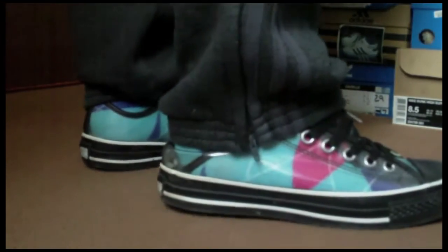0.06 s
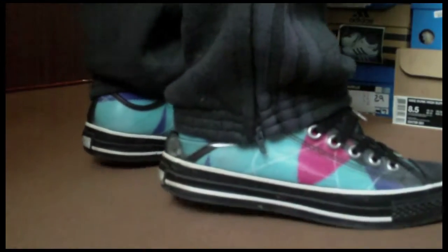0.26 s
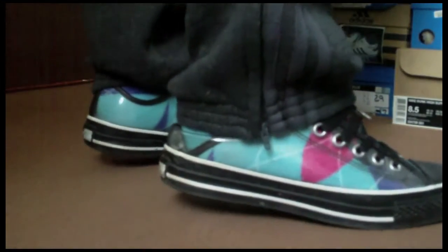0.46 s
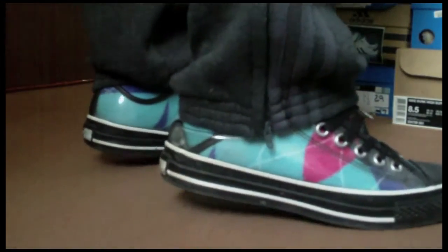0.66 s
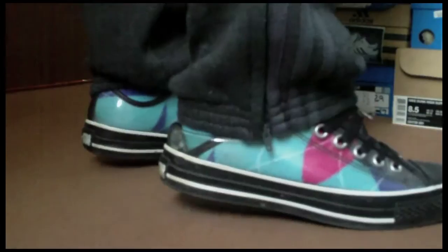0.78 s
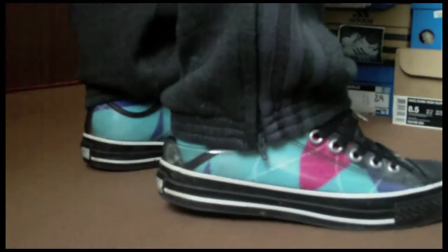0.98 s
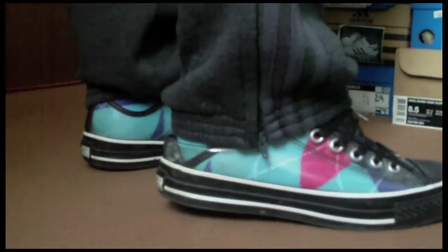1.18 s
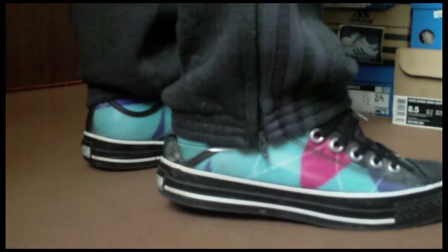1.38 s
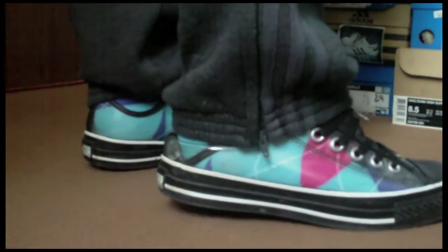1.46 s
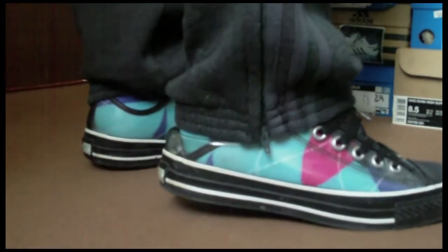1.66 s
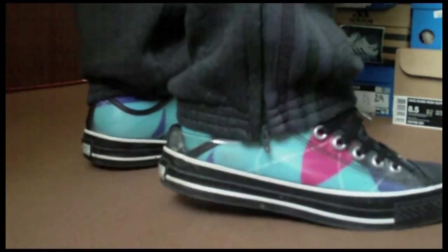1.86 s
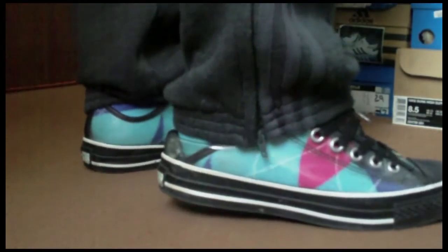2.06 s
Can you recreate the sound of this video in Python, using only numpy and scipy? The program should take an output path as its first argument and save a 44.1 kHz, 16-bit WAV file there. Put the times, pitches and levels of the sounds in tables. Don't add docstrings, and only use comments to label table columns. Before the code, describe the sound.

Shoe soles shift with sticky creaks, a hard heel knock and tiny squeaks over faint hiss.

```python
import sys
import numpy as np
from scipy import signal
from scipy.fft import rfft, irfft
from scipy.io import wavfile
from scipy.ndimage import uniform_filter1d

SR = 44100
rng = np.random.default_rng(int(sys.argv[2]) if len(sys.argv) > 2 else 0)


def natural_amplitude(level_db):
    exponent = np.asarray(level_db, float) / 20
    return 10 ** exponent


def dump_mix(stems):
    frames = np.atleast_2d(stems).T
    limited = np.clip(frames, -1, 1)
    pcm = np.round(limited * 32767).astype(np.int16)
    wavfile.write(sys.argv[1], SR, pcm)


N = 92610


def band(x, hz, width_hz):
    return signal.lfilter(*signal.iirpeak(hz, hz / width_hz, fs=SR), x)


def steep(x, low_hz, high_hz):
    return signal.sosfilt(signal.butter(4, [low_hz, high_hz], "band", fs=SR, output="sos"), x)


def ring(x, hz, t60):
    pole = np.exp(2j * np.pi * hz / SR - np.log(1000) / (t60 * SR))
    return signal.lfilter([1], [1, -pole], x).imag


def add(out, s, x):
    i = max(int(s * SR), 0)
    out[i:i + len(x)] += x[:N - i]


def walk(rate, size):
    hold = int(SR / rate)
    steps = np.repeat(rng.standard_normal(size // hold + 1), hold)
    return 1.3 * uniform_filter1d(steps, hold)[:size]


def hiss():
    # (frequency [Hz], level [dB per Hz])
    colour = [(70, -36), (228, -13.5), (524, -6.5), (1100, -3.5), (2500, -15), (6000, -24.5), (11000, -28),
              (15000, -39.5)]
    # (time [s], level [dB])
    stir = [
        (0, 0.5),
        (.7, -0.5),
        (1.3, 0),
        (1.6, -2),
    ]
    level_db, swell_db, flicker_db = -58, 0.3, 1.0
    hz = np.maximum(np.fft.rfftfreq(N, 1 / SR), 1)
    colour_hz, colour_db = np.transpose(colour)
    spectrum = rfft(rng.standard_normal(N)) * natural_amplitude(np.interp(np.log(hz), np.log(colour_hz), colour_db))
    place = 2 * np.log2(hz / 30)
    swell = walk(1.96, N)
    out = 0
    for k in range(20):
        one_band = irfft(spectrum * np.clip(1 - abs(place - k), 0, 1), N)
        out = out + one_band * natural_amplitude(swell_db * swell + flicker_db * walk(12.28, N))
    stir_db = np.interp(np.arange(N) / SR, *np.array(stir).T)
    return out * natural_amplitude(level_db + stir_db) / np.std(out)


def room(x):
    level_db, gap_s, t60_s, top_hz = -11, 0.007, 0.12, 4100
    t = np.arange(SR // 2) / SR
    tail = rng.standard_normal(len(t)) * natural_amplitude(-60 * t / t60_s) * (t > gap_s)
    tail = signal.lfilter(*signal.butter(1, top_hz, fs=SR), tail)
    return natural_amplitude(level_db) * signal.fftconvolve(x, tail / np.sqrt(np.sum(tail ** 2)))[:N]


def thuds():
    # (time [s], level [dB])
    landings = [
        (0.0, -55.5),
        (0.051, -78),
        (0.205, -46),
        (.225, -62),
        (0.789, -74),
        (0.991, -72),
        (1.215, -68.5),
    ]
    push = np.zeros(N)
    for s, db in landings:
        add(push, s, natural_amplitude(db) * np.hanning(90) / 45)
    floor = ring(push, 131, 0.036)
    hollow = ring(push, 238, 0.052)
    return floor + natural_amplitude(-0.5) * hollow


def squeaks():
    # (time [s], length [s], start pitch [Hz], end pitch [Hz], level [dB])
    chirps = [(0.0, 0.044, 6300, 6300, -68.5), (.048, 0.0083, 6960, 7260, -64),
              (.058, 0.028, 7150, 7000, -80), (.046, 0.0071, 4200, 4180, -54.5),
              (.058, 0.039, 4120, 4000, -72), (0.063, 0.023, 9800, 9900, -80),
              (0.615, 0.019, 2895, 2860, -68.5), (0.941, 0.021, 4240, 3990, -72.5),
              (0.961, 0.019, 4000, 3790, -72.5), (0.994, .035, 11200, 10800, -79),
              (1.172, 0.0096, 3640, 3650, -66), (1.219, .022, 9230, 9180, -80),
              (1.235, 0.058, 9220, 9235, -70), (1.254, 0.0074, 3840, 3870, -55)]
    flutter_db, wobble = 1.8, 0.003
    out = np.zeros(N)
    for s, length, start_hz, end_hz, db in chirps:
        pitch_drift, level_drift = walk(160, 4000), walk(200, 4000)
        u = np.arange(int(length * SR)) / (length * SR)
        hz = (start_hz + (end_hz - start_hz) * u) * (1 + wobble * pitch_drift[:len(u)])
        fade = np.minimum(8 * u, 1) * np.minimum(2.5 * (1 - u), 1)
        drift_db = flutter_db * (1 + abs(end_hz - start_hz) / 120) * level_drift[:len(u)]
        add(out, s, 2.0 * fade * natural_amplitude(db + drift_db) * np.sin(2 * np.pi * np.cumsum(hz) / SR))
    return out


def grit():
    # (time [s], level [dB], top frequency [Hz], t60 [s])
    crackles = [(0.0, -62, 4940, 0.061), (0.045, -56, 8100, 0.072), (0.198, -32, 5240, 0.066),
                (.202, -41.5, 7800, 0.067), (.2045, -49, 12000, .02), (.98, -74, 4860, .05),
                (1.208, -42.5, 8950, 0.029), (1.216, -43.5, 8700, 0.059), (1.227, -65, 8500, 0.037),
                (1.245, -54, 8000, 0.092), (1.204, -64, 14500, 0.15)]
    low_hz, scatter_db, attack_s = 2850, 2.5, 0.0047
    out = np.zeros(N)
    t = np.arange(6000) / SR
    for s, db, top_hz, t60 in crackles:
        grains = rng.standard_normal(6000) * natural_amplitude(scatter_db * walk(340, 6000))
        shape = natural_amplitude(db - 60 * t / t60) * np.minimum(t / attack_s, 1)
        add(out, s, shape * steep(grains, low_hz, top_hz))
    return out


def boards(x):
    # (frequency [Hz], level [dB], t60 [s])
    modes = [(530, -60, 0.11), (640, 4, 0.014), (828, 5.5, 0.047), (889, 4.5, .025), (1080, -5, 0.028),
             (1198, 0.5, .03), (1446, 1.5, 0.036), (1718, 2.5, 0.017), (1907, 1, 0.072), (2104, -7, 0.061),
             (2590, 2.5, 0.01), (2910, 2.5, 0.046), (3420, 6, 0.014), (3730, -11, 0.027)]
    return sum((-1) ** k * natural_amplitude(db) * ring(x, hz, t60) for k, (hz, db, t60) in enumerate(modes)) / 4


def knocks():
    # (time [s], level [dB], contact [ms])
    hits = [(.2006, -11.5, 0.13), (.2036, -2, 0.54), (.2076, -13.5, 0.32), (.2147, -21, 0.8),
            (.218, -23, 0.16), (.2253, -9.5, 0.9), (.2288, -25, 0.44), (.2338, -18.5, 0.43),
            (1.2124, -22, 0.3), (1.2172, -28.5, 0.71), (1.2264, -21, 0.67)]
    push = np.zeros(N)
    for s, db, ms in hits:
        n = max(ms * SR / 1000, 2)
        add(push, s, natural_amplitude(db) * np.sin(np.pi * np.arange(int(n) + 1) / n) / n)
    return boards(push) + natural_amplitude(6.5) * ring(push, 1100, 0.0078)


def slips():
    # (time [s], level [dB], sole ring [Hz], treble [dB], length [s])
    rise = [(0.0, -37.5, 1362, -21, .012), (0.019, -53.5, 1340, -46, 0.09),
            (0.0473, -34.5, 1481, -15, 0.012), (0.065, -46, 1301, -25, 0.018),
            (0.1167, -48, 1351, -54, 0.028), (0.1973, -18.5, 1255, -32, 0.0098),
            (0.236, -36, 1247, -19.5, 0.021), (0.27, -42, 1163, -20, 0.024),
            (0.283, -39.5, 1260, -35, 0.011), (0.304, -43.5, 1364, -32, 0.0066),
            (0.315, -42, 1244, -39, .017), (0.341, -54, 1100, -34, 0.018), (.404, -54, 1147, -19, 0.0073)]
    # (time [s], level [dB], sole ring [Hz], treble [dB], length [s])
    settle = [(.612, -53, 1034, -20, 0.0033), (.618, -46, 867, -33, 0.0063), (0.64, -54, 824, -35, 0.016),
              (0.646, -47.5, 613, -28, 0.0095), (0.667, -58.5, 820, -24, 0.007),
              (0.752, -48.5, 880, -32, 0.0034), (0.762, -50, 642, -26, .008),
              (0.787, -38, 1259, -43, 0.0077), (0.7975, -43, 1304, -34, 0.0093),
              (.815, -58.5, 1320, -37, 0.04), (0.979, -41.5, 1330, -9.5, 0.016),
              (1.006, -48, 1367, -15, 0.0089), (1.031, -48.5, 1100, -22, 0.021),
              (1.047, -47, 1114, -51, 0.028), (1.08, -52, 969, -22, 0.053), (1.136, -54.5, 1220, -21, .022),
              (1.158, -52.5, 1179, -16, 0.024), (1.202, -49, 1800, -2.5, 0.0082),
              (1.21, -43, 2213, -4, 0.02), (1.236, -40, 1497, -17.5, 0.026),
              (1.265, -45.5, 1309, -16, 0.026), (1.305, -49.5, 1158, -14, 0.013)]
    clicks_per_s, jitter, scatter_db, step_slip = 650, 0.35, 2.5, 0.22
    attack_s, sag_db, click_top_hz = 0.003, -2, 2780
    sole_q, board_db = 2.15, -12.5
    scrape_low_hz, scrape_top_hz, grain_s = 1800, 4260, 0.0036

    def level(v, length):
        return v / np.sqrt(np.sum(v ** 2) / (length * SR))

    out = np.zeros(N)
    chance = rng.standard_normal((len(rise + settle), 3, 40))
    for (s, db, hz, treble_db, length), (gap, size, stray) in zip(rise + settle, chance):
        t = np.cumsum(np.exp(jitter * gap)) / clicks_per_s
        t = abs(np.round((t - t[0]) * hz) + step_slip * stray) / hz
        keep = t < length
        shape = np.minimum(t / attack_s + 0.44, 1) * natural_amplitude(sag_db * t / length + scatter_db * size)
        clicks = np.zeros(6000)
        np.add.at(clicks, (t[keep] * SR).astype(int), shape[keep])
        soft = signal.lfilter(*signal.butter(3, click_top_hz, fs=SR), clicks)
        sole = level(band(band(soft, hz, hz / sole_q), hz, 2 * hz / sole_q), length)
        smear = signal.lfilter([1], [1, -np.exp(-1 / (grain_s * SR))], abs(clicks))
        smear = smear * rng.standard_normal(6000)
        scrape = level(steep(smear, scrape_low_hz, scrape_top_hz), length)
        wood = level(boards(band(band(soft, hz, hz), hz, 2 * hz)), length)
        add(out, s, natural_amplitude(db) * (sole + natural_amplitude(treble_db) * scrape + natural_amplitude(board_db) * wood))
    return out


def scene():
    shoes = slips() + knocks() + squeaks() + grit()
    thin = signal.sosfilt(signal.butter(4, 464, "high", fs=SR, output="sos"), shoes + room(shoes))
    low = signal.lfilter(*signal.butter(1, 70, "high", fs=SR), thuds())
    return (thin + low + hiss())[None]


def top_cut(x):
    return signal.sosfilt(signal.butter(12, 15170, fs=SR, output="sos"), x)


def record(dry):
    notches = (7900, 11900)
    for hz in notches:
        dry = dry - 0.47 * band(dry, hz, 200)
    mix = signal.sosfilt(signal.ellip(8, 0.2, 60, 15100, fs=SR, output="sos"), dry)
    return top_cut(mix)


dry = scene()
out = record(dry)
dump_mix(out)
```